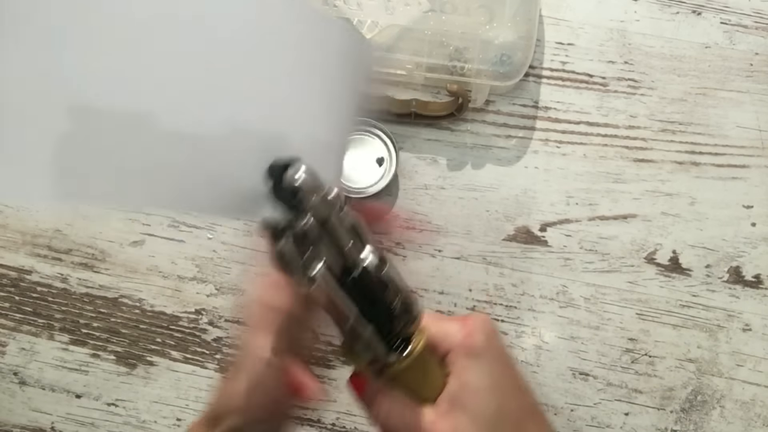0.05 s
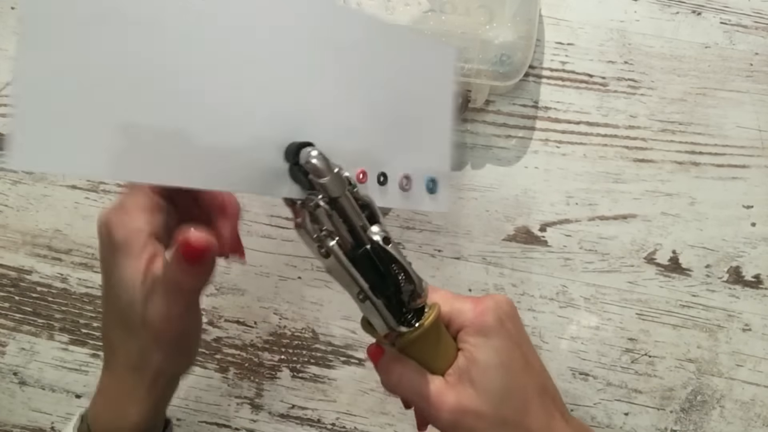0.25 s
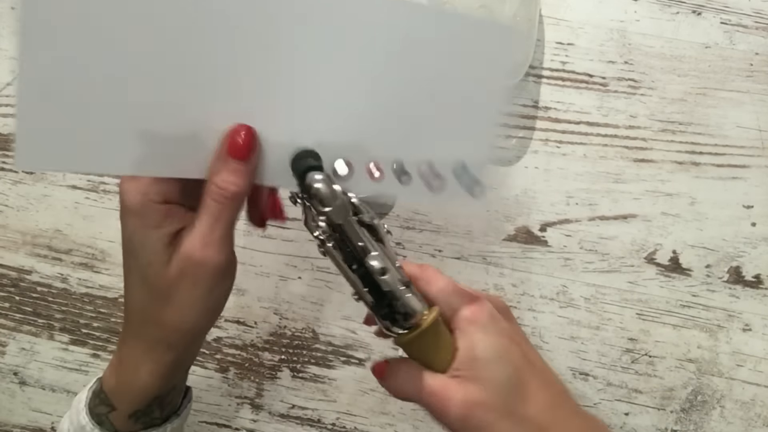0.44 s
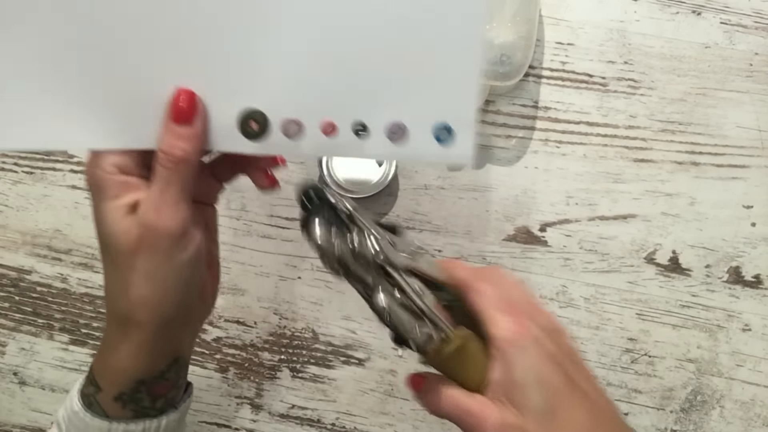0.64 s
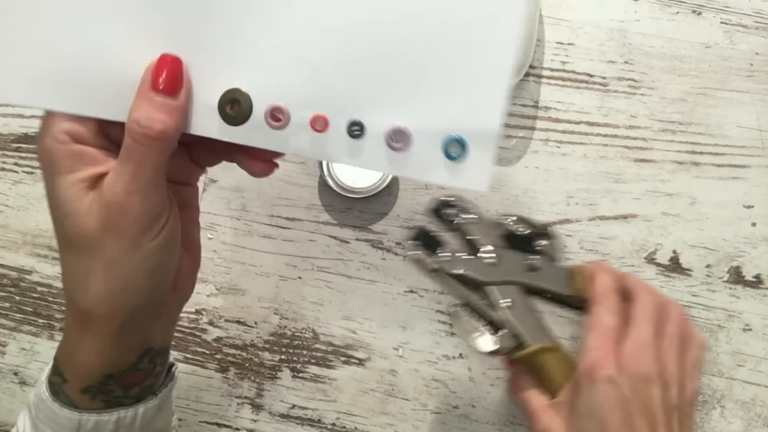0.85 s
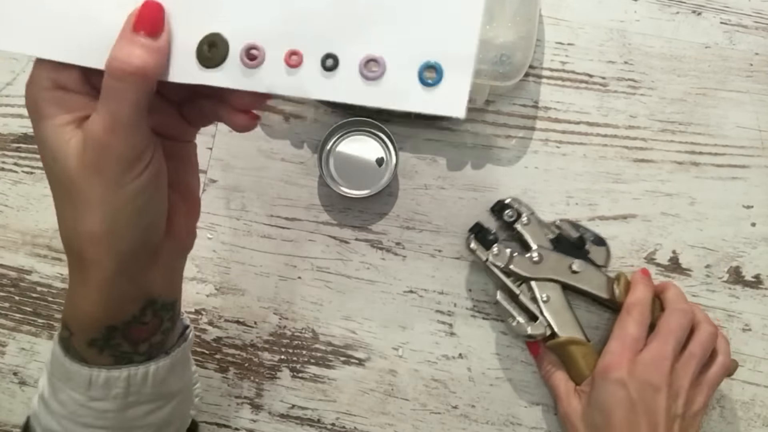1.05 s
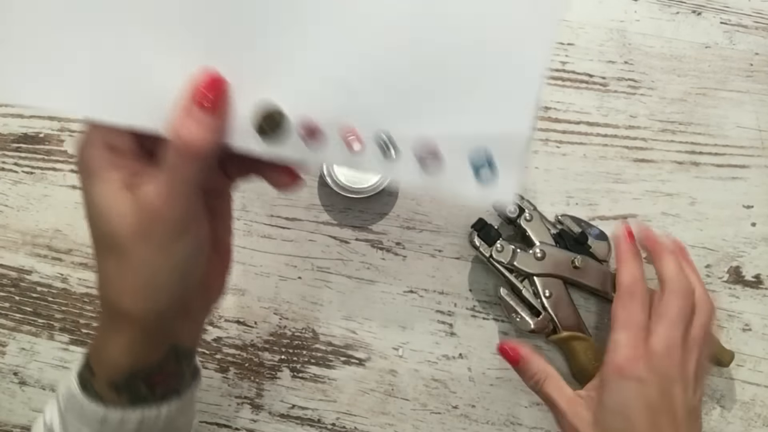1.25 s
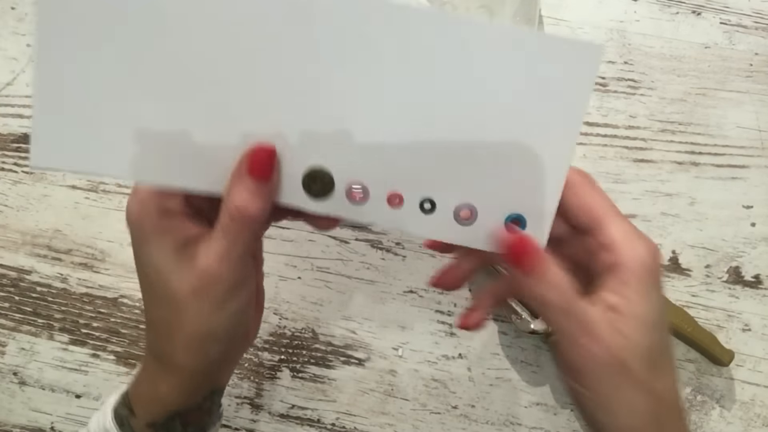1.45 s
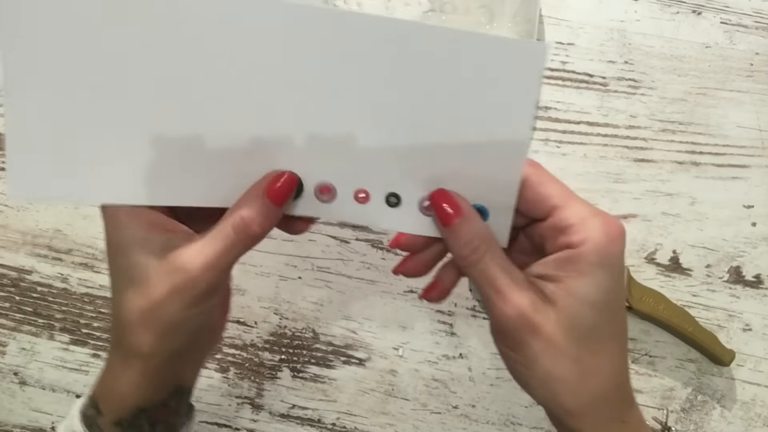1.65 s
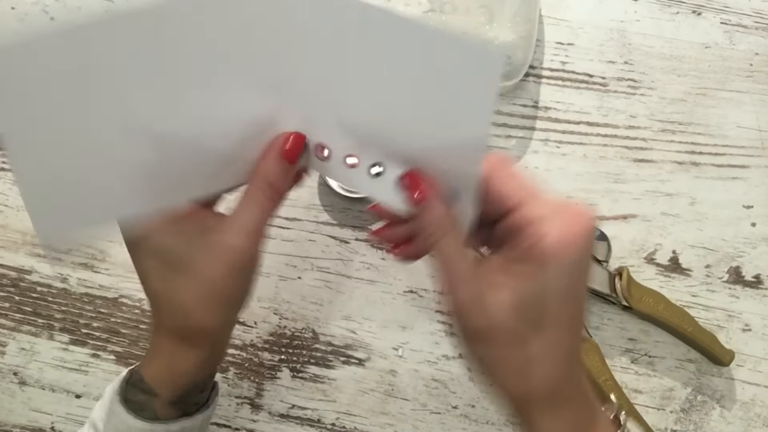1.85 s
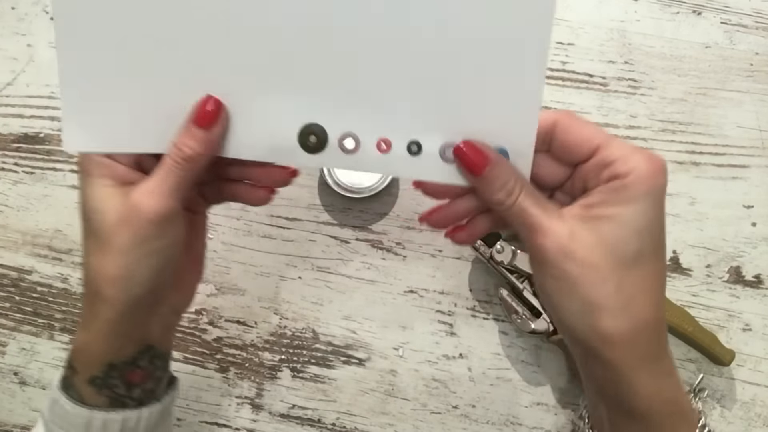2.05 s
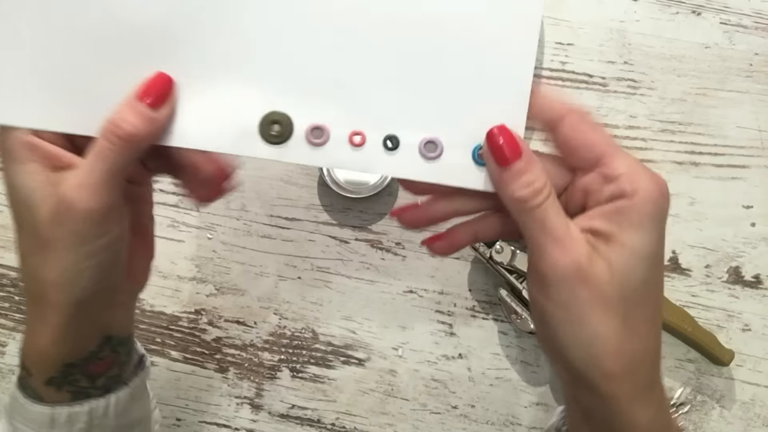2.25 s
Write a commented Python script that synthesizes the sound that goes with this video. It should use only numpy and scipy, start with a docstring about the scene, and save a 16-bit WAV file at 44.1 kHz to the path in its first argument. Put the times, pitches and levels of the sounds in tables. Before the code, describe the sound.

Metal eyelet pliers pull free of stiff card with sharp crackling snaps, then drop on a wooden table in quickening knocks; fingers rustle and flex the card afterwards, close microphone, small quiet room.

```python
"""Pliers worked free of a card

Eyelet pliers are worked free of a sheet of card, which catches, buckles and snaps in chirped noise bursts.
The pliers are put down on a wooden table and rock to rest in quickening knocks of ringing steel and wood.
Fingers then flex the card and slide along it: shaped noise hisses and rustles, with brief ticks and scuffs.
A close microphone in a small, quiet room: filtered noise for the air, noise echoes for the reflections."""
import sys
import numpy as np
from scipy import signal
from scipy.fft import rfft, irfft, next_fast_len
from scipy.io import wavfile

SR = 44100
rng = np.random.default_rng(int(sys.argv[2]) if len(sys.argv) > 2 else 0)


def dump_mix(stems):
    """Bounce the given channels to the path in sys.argv[1] as a 16-bit WAV at rate SR."""
    frames = np.atleast_2d(stems).T  # one column per channel
    limited = np.clip(frames, -1, 1)  # hard clip at full scale
    pcm = np.round(limited * 32767).astype(np.int16)
    wavfile.write(sys.argv[1], SR, pcm)


N = 101429
T = np.arange(N) / SR

# Snaps of the card: (time [s], length [s], flap level [dB], snap level [dB], snap pitch [Hz],
# crackle level [dB])
CARD_SNAPS = [(0.081, 0.0019, -69, -36.5, 1870, -37), (0.126, 0.023, -44, -38, 1240, -60.5),
              (0.208, 0.0033, -47.5, -33.5, 2100, -39.5), (0.223, 0.015, -45.5, -40.5, 1300, -72),
              (0.237, 0.0034, -40.5, -28, 1430, -36.5), (0.251, 0.022, -43, -27, 1465, -49),
              (.2572, .0007, -44, -23, 1950, -70), (0.263, 0.016, -35.5, -25, 1790, -62),
              (0.2816, 0.0067, -57, -26, 1840, -55), (0.385, 0.05, -43.5, -47.5, 980, -95),
              (0.453, 0.03, -70, -47, 1770, -54.5), (0.464, 0.0032, -64, -55, 1590, -52.5),
              (0.476, 0.006, -44.5, -40, 1310, -82), (0.5047, 0.0015, -48, -33, 1580, -42),
              (0.517, 0.015, -41, -36.5, 1420, -68), (0.5291, 0.0067, -42.5, -27, 1460, -55),
              (1.6319, 0.0035, -50, -52, 2000, -59), (1.646, 0.014, -77, -48, 1480, -57),
              (1.764, 0.00067, -47.5, -37, 1350, -54.5), (1.861, 0.014, -45, -43.5, 1130, -70),
              (1.99, 0.0058, -47, -44.5, 1000, -61), (2.003, 0.0024, -39, -35.5, 1820, -58.5),
              (2.015, 0.0031, -48.5, -35, 1390, -67)]
# Colour of the flapping sheet: (frequency [Hz], level [dB])
FLAP_COLOUR = [(28, -22), (55, -2), (120, -6), (260, -1), (500, 2.5), (720, -14), (6000, -48)]
# Colour of the dry crackle: (frequency [Hz], level [dB])
CRACKLE_COLOUR = [(1500, -26), (3200, 11), (4900, -0.5), (6600, 4), (8000, -4.5), (10500, -12),
                  (13000, -9.5), (16000, -19.5)]
# Colour of a snap about its own pitch: (frequency [ratio to pitch], level [dB])
SNAP_COLOUR = [(.3, -30.5), (.72, 7.5), (1, 8.5), (1.35, 3), (1.9, -8.5), (10, -68)]
BEND_LAG_S = 0.00243  # how far 500 Hz trails 2 kHz in the bending sheet
FIBRE_SPREAD, FIRST_CLICK = 0.89, 0.21  # unevenness of the slips; click of the very shortest snap
RISE_SHARE = 0.37  # rise time as a share of the decay time
EDGE_ECHO, EDGE_LAG_S = 0.19, 0.0034  # gain and shortest delay of the faint echo in each snap

# Short ticks, scuffs and bright sweeps: (time [s], length [s], level [dB], pitch [Hz])
TICKS_AND_SCUFFS = [(.052, 0.0007, -66, 1940), (.586, .003, -57.5, 3080), (0.623, 0.0044, -64, 4500),
                    (0.681, 0.0021, -59, 3160), (0.702, 0.0071, -58.5, 3270), (0.853, .01, -59, 1670),
                    (0.958, 0.015, -59.5, 1980), (1.116, 0.0096, -49, 845), (1.6366, 0.0024, -49, 2880),
                    (1.707, 0.0011, -54, 1380), (1.7465, 0.00064, -55.5, 2350), (1.869, 0.0013, -50, 3320),
                    (2.061, 0.048, -53.5, 12900), (2.1, .025, -58, 6000), (2.245, 0.038, -59, 13000)]
SCUFF_WIDTH, SCUFF_GRAIN = 0.27, 0.75  # half-width of the band [log ratio]; unevenness of the noise

# Knocks of the pliers on the table: (time [s], thump level [dB], wood level [dB], metal level [dB],
# crack level [dB], crack cut-off [Hz])
PLIERS_KNOCKS = [(1.1228, -35, -24, -27, -26, 9450), (1.2152, -32, -35, -33.5, -29.5, 9900),
                 (1.2979, -39.5, -34, -73, -33.5, 4040), (1.3473, -54, -45, -72, -40.5, 5750),
                 (1.3776, -41, -43, -55.5, -47, 7400), (1.404, -51.5, -50.5, -57.5, -69, 5000),
                 (1.577, -88, -87, -78, -50, 5740)]
# Low modes of the table: (frequency [Hz], level [dB], t60 [s])
TABLE_MODES = [(56, -5.5, 0.057), (107.5, -15.5, 0.47), (125.3, -4, 0.17), (168.4, -9.5, 0.13),
               (265, -5, 0.055), (341.8, -5, 0.084)]
# Modes of the table's boards: (frequency [Hz], level [dB], t60 [s])
BOARD_MODES = [(708, -11.5, 0.066), (896, 3, 0.049), (1093, 2, 0.028), (1277, 5.5, 0.024),
               (1430, 6.5, 0.017)]
# Modes of the steel pliers: (frequency [Hz], level [dB], t60 [s])
PLIERS_MODES = [(2250, 4, 0.039), (2375, 9, 0.009), (2620, -18, 0.067), (3310, -11, 0.057),
                (4230, -5.5, 0.017), (5700, 3.5, 0.0096)]
# Colour of the crack at contact: (frequency [Hz], level [dB])
CRACK_COLOUR = [(100, 9), (700, -5), (1000, 3), (1800, -1), (2400, 6), (3700, 2), (4800, -11.5),
                (6000, -9.5), (10500, -20.5), (16000, -9)]
CRACK_S, JOINT_RATTLE_S = 0.0011, 0.0013  # time to the peak of each burst
CLATTER_S, CLATTER_DB = 0.1, -14  # decay of the fine chatter, and its energy against the crack's burst
CONTACT_DETUNE = 0.012  # random detune of the board and steel modes at each knock [share of frequency]
CHATTER_DRIVE = 0.15  # gain of the chatter that keeps the modes ringing

# Thin singing line
WHINE_HZ, WHINE_SAG_HZ_PER_S, WHINE_WIDTH_HZ = 4210, 150, 100  # pitch at the peak, fall, waver cut-off
WHINE_PEAK_S, WHINE_LENGTH_S, WHINE_DB = 1.55, 0.16, -68.5

# Fingers sliding on the card: (time [s], level [dB])
SLIDE_LEVEL = [(.16, -68.5), (.23, -55), (.3, -62.5), (.42, -100), (.46, -73), (.8, -68), (.9, -73.5),
               (1.62, -75.5), (1.65, -56), (1.72, -72), (1.93, -74), (2.05, -54.5), (2.13, -56.5),
               (2.2, -70.5), (2.27, -62.5)]
# Colour of the slide: (frequency [Hz], level [dB])
SLIDE_COLOUR = [(500, -37.5), (1500, 12.5), (3200, 20), (4800, 6), (6500, 12.5), (10000, 2.5), (13000, 2),
                (16000, 7.5)]
# Rustle of the card in the hands: (time [s], level [dB])
RUSTLE_LEVEL = [(.06, -75.5), (.16, -64), (.56, -53), (.63, -67), (.72, -63), (.9, -70.5), (1.08, -73.5),
                (1.5, -63.5), (1.82, -61.5), (1.94, -64), (2.05, -57), (2.2, -69.5)]
# Colour of the rustle: (frequency [Hz], level [dB])
RUSTLE_COLOUR = [(45, -31), (100, -3), (276, -3), (764, -7.5), (1270, 4.5), (4840, -20.5), (9000, -37),
                 (16000, -83)]
# Colour of tiny creases giving way: (frequency [Hz], level [dB])
CRINKLE_COLOUR = [(600, -29.5), (1400, -1.5), (3200, -10), (14000, -47.5)]
SLIDE_GRAIN, CRINKLE_SPREAD = 0.65, 0.7  # unevenness of the slide and of the creases
CRINKLE_DB = -6  # against the rustle

# Colour of the still air: (frequency [Hz], level [dB])
AIR_COLOUR = [(100, 11), (200, 3), (700, -5), (2500, -40), (16000, -32)]
AIR_DB = -74
# Decay of the room tail: (frequency [Hz], t60 [s])
ROOM_DECAY = [(100, 0.69), (2000, 0.22), (6000, 0.32), (14000, 0.13)]
CARD_ROOM_DB, PLIERS_ROOM_DB = -26, -15.5  # tail energy against the direct sound
NEAR_DB, NEAR_S = -10, 0.0089  # energy and decay of the quick reflections
TOP_HZ = 16000


def card_snaps():
    """Each buckle is a click within a burst of fibre slips; the sheet spreads it into a falling chirp."""
    out, size, lead = np.zeros(N), 8192, 1024  # lead: samples kept for the rise
    t = (np.arange(size) - lead) / SR
    hz = np.fft.rfftfreq(size, 1 / SR)
    # Bending waves carry the treble first
    lag = BEND_LAG_S * (np.sqrt(2000 / np.maximum(hz, 200)) - 1)
    bend = np.exp(-2j * np.pi * np.cumsum(lag) * SR / size)
    for start, length, flap_db, snap_db, snap_hz, crackle_db in CARD_SNAPS:
        rise = -t / (length * RISE_SHARE)
        swell = np.exp(-np.maximum(t / length, rise))
        click = FIRST_CLICK * np.exp(-length / 0.027) * (t == 0)  # weaker in longer snaps
        slips = unit(grains(size, FIBRE_SPREAD) * swell) + click

        # A faint echo at a random short delay, like waves returning from the edge
        edge_lag = EDGE_LAG_S * rng.uniform(1, 2.7)
        edge = EDGE_ECHO * np.exp(-2j * np.pi * hz * edge_lag)
        push = irfft(rfft(slips) * bend / (1 + edge), size)

        flutter = grains(size, 0.2) * np.exp(-np.maximum(t / (length + 0.012), rise))
        flap = colour(flutter, FLAP_COLOUR)
        snap = colour(push, [(ratio * snap_hz, db) for ratio, db in SNAP_COLOUR])
        crackle = colour(push, CRACKLE_COLOUR)
        mix = blow(flap, flap_db) + blow(snap, snap_db) + blow(crackle, crackle_db)
        add(out, start - lead / SR, mix)
    return out


def pliers_knocks():
    """The loose-jointed pliers strike the table: a crack and chatter, ringing steel and boards, a low thump."""
    out, t = np.zeros(N), T[:SR]
    click = t == 0
    give = 1 - np.exp(-t / 0.0045)  # the wood takes a moment to give
    for start, thump_db, wood_db, metal_db, crack_db, cut_hz in PLIERS_KNOCKS:
        chatter = amp(CLATTER_DB) * unit(grains(len(t), 0.7) * np.exp(-t / CLATTER_S))
        contact = click + CHATTER_DRIVE * chatter

        table = ring(TABLE_MODES, t)
        boards = signal.fftconvolve(contact, ring(BOARD_MODES, t, CONTACT_DETUNE))[:len(t)]
        strike = contact + 0.19 * burst(t, JOINT_RATTLE_S)
        metal = signal.fftconvolve(strike, ring(PLIERS_MODES, t, CONTACT_DETUNE))[:len(t)]

        crack = colour(0.18 * click + burst(t, CRACK_S) + chatter, CRACK_COLOUR)
        crack = butter(crack, 2, cut_hz)

        wood = blow(table * give, thump_db) + blow(boards * give, wood_db)
        add(out, start, wood + blow(metal, metal_db) + blow(crack, crack_db))
    return out


def ticks_and_scuffs():
    """Short ticks, scuffs and bright sweeps: brief band-passed noise bursts, each about its own pitch."""
    out = np.zeros(N)
    for start, length, db, hz in TICKS_AND_SCUFFS:
        t = (T - start) / length
        noise = grains(N, SCUFF_GRAIN) * np.exp(-np.maximum(t, -t / RISE_SHARE))
        edges = hz * np.exp([-SCUFF_WIDTH, SCUFF_WIDTH])
        out += blow(butter(noise, 2, edges, "band"), db)
    return out


def handling():
    """Skin hisses along the card while the sheet rustles and tiny creases tick."""
    slide = unit(colour(grains(N, SLIDE_GRAIN), SLIDE_COLOUR))

    # Noise of jumpy strength stands for the creases
    ticks = np.minimum(np.exp(CRINKLE_SPREAD * rng.standard_normal(700)), 30)
    strength = np.interp(T, np.linspace(0, T[-1], len(ticks)), ticks)
    crinkle = colour(rng.standard_normal(N) * strength, CRINKLE_COLOUR)

    rustle = unit(colour(grains(N, 0.46), RUSTLE_COLOUR)) + amp(CRINKLE_DB) * unit(crinkle)
    return slide * follow(SLIDE_LEVEL) + rustle * follow(RUSTLE_LEVEL)


def whine():
    """A thin, unsteady line: noise-modulated tone that swells and fades near the last knock as it sinks."""
    t = T - WHINE_PEAK_S
    waver = butter(rng.standard_normal(N) + 1j * rng.standard_normal(N), 2, WHINE_WIDTH_HZ)
    phase = 2 * np.pi * np.cumsum(WHINE_HZ - WHINE_SAG_HZ_PER_S * t) / SR
    sing = np.real(waver * np.exp(1j * phase))
    swell = np.exp(-0.5 * (t / WHINE_LENGTH_S) ** 2)
    return unit(sing) * np.sqrt(N) * amp(WHINE_DB) * swell


def still_air():
    """The quiet room's steady, mostly low murmur, as coloured noise."""
    return unit(colour(rng.standard_normal(N), AIR_COLOUR)) * np.sqrt(N) * amp(AIR_DB)


def room(x, tail_db):
    """Quick reflections from the table top and a diffuse tail from the walls."""
    t, tail = T[:SR], 0
    edges = np.geomspace(60, 18000, 9)
    hz, t60 = np.array(ROOM_DECAY).T
    for lo, hi in zip(edges, edges[1:]):
        band = butter(rng.standard_normal(SR), 2, [lo, hi], "band")
        band_t60 = np.interp(np.log(lo * hi) / 2, np.log(hz), t60)
        tail = tail + band * np.exp(-np.log(1000) * t / band_t60)
    tail = tail * (1 - np.exp(-t / 0.018))  # the tail builds up gradually
    near = rng.standard_normal(SR) * np.exp(-t / NEAR_S) * (t > 0.002)
    echoes = amp(tail_db) * unit(tail) + amp(NEAR_DB) * unit(near)
    return x + signal.fftconvolve(x, echoes)[:N]


def amp(db):
    """Decibels to gain."""
    return 10 ** (np.asarray(db) / 20)


def unit(x):
    """Scale to an energy of one."""
    return x / np.sqrt(np.sum(x ** 2) + 1e-30)


def blow(x, db):
    """Scale a short sound to its level, reckoned as if it lasted 10 ms."""
    return unit(x) * amp(db) * np.sqrt(SR / 100)


def follow(curve):
    """Gain that draws a unit-energy sound along a level curve."""
    return amp(np.interp(T, *np.array(curve).T)) * np.sqrt(N)


def butter(x, order, hz, kind="low"):
    """Butterworth filter."""
    return signal.sosfilt(signal.butter(order, hz, kind, fs=SR, output="sos"), x)


def colour(x, points):
    """Causal minimum-phase filter through (frequency [Hz], level [dB]) points."""
    n = next_fast_len(len(x) + 4096, True) // 2 * 2
    hz, db = np.array(points, float).T
    curve = np.interp(np.log(np.fft.rfftfreq(n, 1 / SR) + 1), np.log(hz), db)
    # Folding the cepstrum forward in time makes the response causal
    cepstrum = irfft(np.log(amp(curve)), n)
    cepstrum[1:n // 2] *= 2
    cepstrum[n // 2 + 1:] = 0
    return irfft(rfft(x, n) * np.exp(rfft(cepstrum)), n)[:len(x)]


def add(out, start, x):
    """Mix a sound in at a time."""
    i = max(int(start * SR), 0)
    out[i:i + len(x)] += x[:max(N - i, 0)]


def grains(size, spread):
    """Dense tiny clicks of uneven size, rms one."""
    a, b = rng.standard_normal((2, size))
    return unit(a * np.exp(spread * b)) * np.sqrt(size)


def burst(t, peak_s):
    """Unit-energy burst of grains that swells to its peak and dies away."""
    return unit(grains(len(t), 0.27) * t * np.exp(-t / peak_s))


def ring(modes, t, spread=0):
    """Impulse response of a table of modes, each detuned at random by the spread."""
    detune = 1 + spread * rng.standard_normal(len(modes))
    out = np.zeros(len(t))
    for (hz, db, t60), shift in zip(modes, detune):
        out += amp(db) * np.sin(2 * np.pi * hz * shift * t) * np.exp(-np.log(1000) * t / t60)
    return out


def scene():
    """Card, pliers and hands over the still air of the room."""
    card = room(card_snaps() + ticks_and_scuffs(), CARD_ROOM_DB)
    pliers = room(pliers_knocks(), PLIERS_ROOM_DB)
    return (card + pliers + handling() + whine() + still_air())[None]


def record(dry):
    """The recorder cuts the deepest bass and the top."""
    thin = butter(dry, 4, 36, "high")
    return signal.sosfilt(signal.ellip(10, 0.2, 70, TOP_HZ, fs=SR, output="sos"), thin)


dry = scene()
out = record(dry)
dump_mix(out)
```